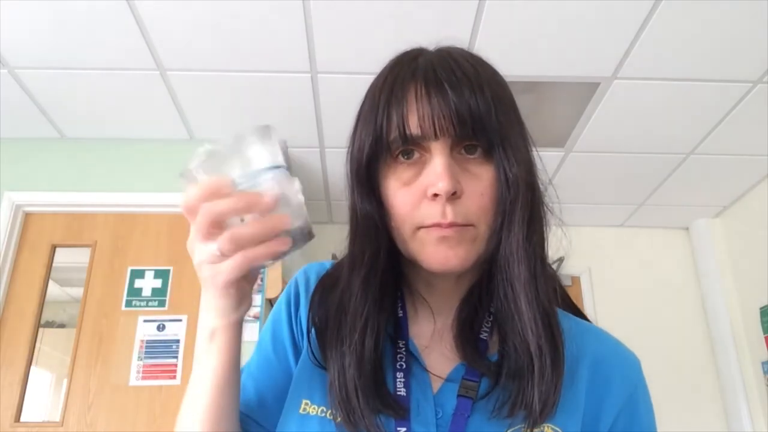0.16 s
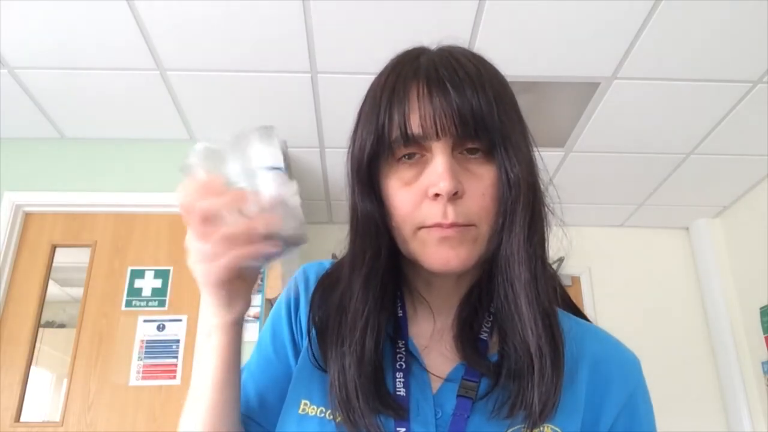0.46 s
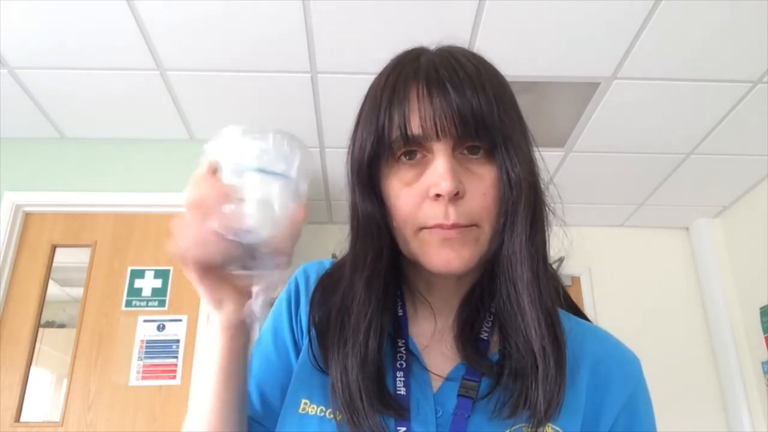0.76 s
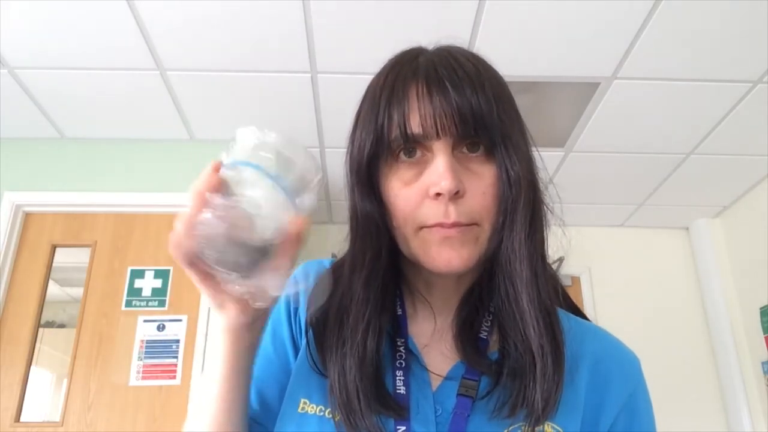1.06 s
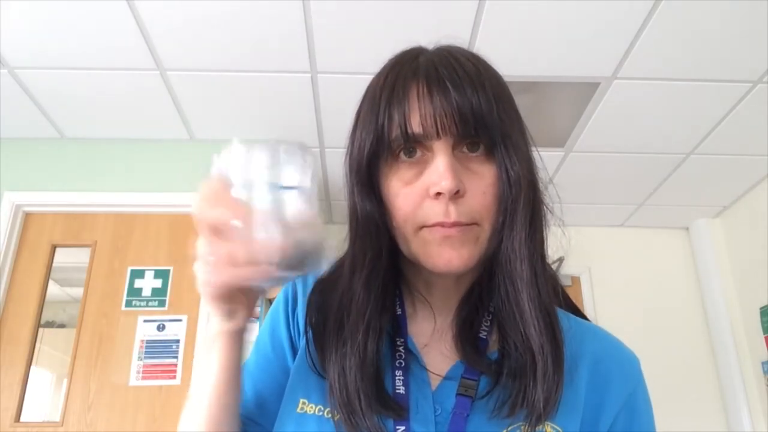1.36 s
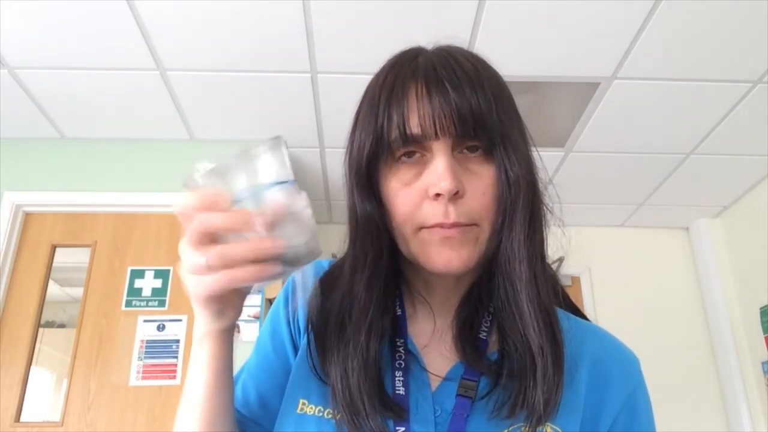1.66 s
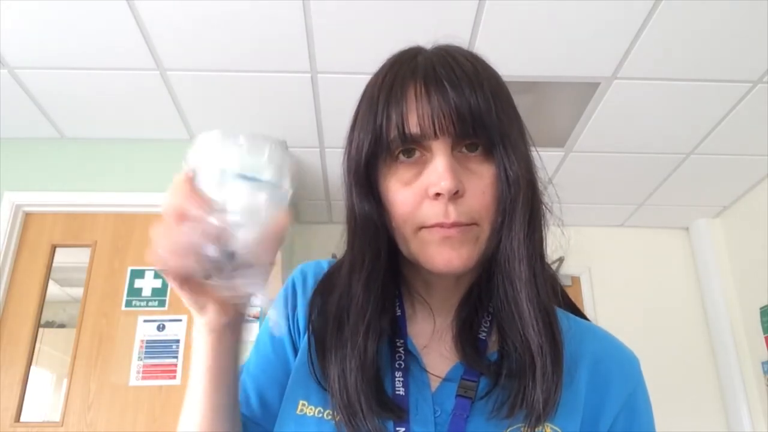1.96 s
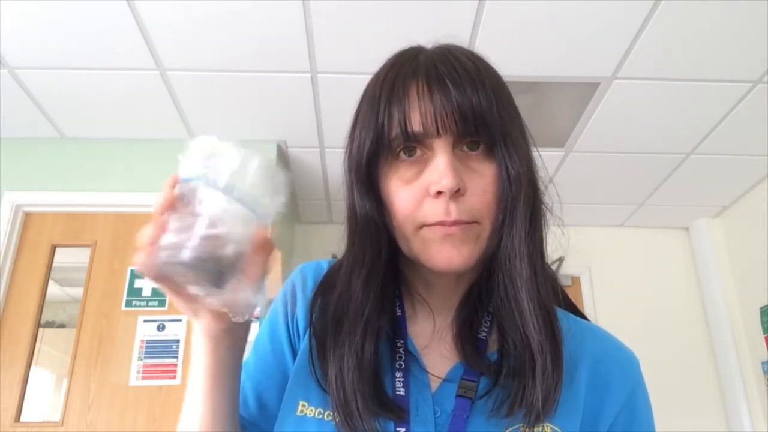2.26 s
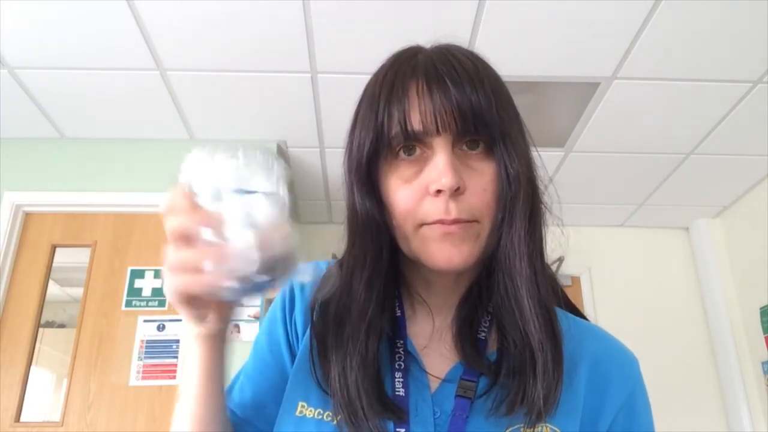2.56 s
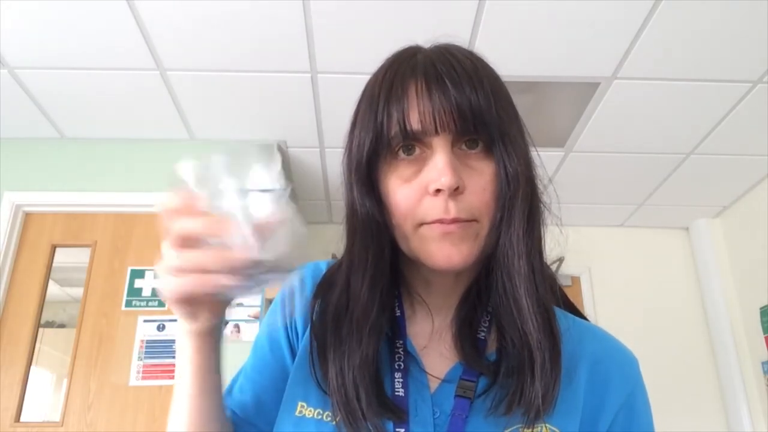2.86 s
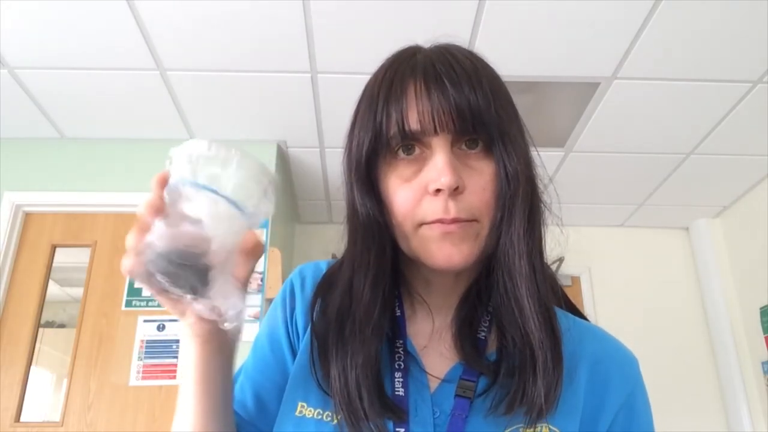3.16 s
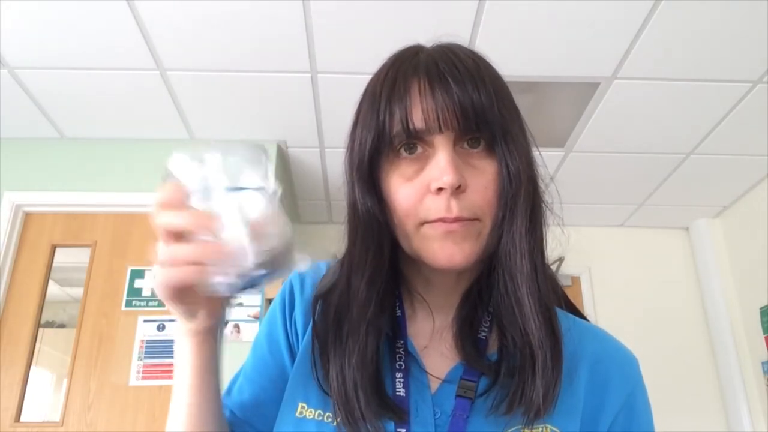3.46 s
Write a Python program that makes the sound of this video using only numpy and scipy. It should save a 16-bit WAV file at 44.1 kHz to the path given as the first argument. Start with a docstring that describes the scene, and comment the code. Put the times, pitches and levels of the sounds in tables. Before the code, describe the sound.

A small plastic bottle of hard beads shaken fast, giving a loud, even, crisp rattle indoors

```python
"""A small plastic bottle part-filled with hard beads is shaken to and fro about six times a second.
Ventilation rumbles low in a quiet office from the start, and sliding beads tick along the wall between turns.
At each turn beads pile against one end: noise impacts swell through the resonances of hollow, wall and beads.
From the first turns on, short noise bursts add single cracks and hollow thumps; dull thuds join after half a second.
Room echoes, shifting from turn to turn, trail the bottle, heard close up with the highest treble cut away."""
import sys
import numpy as np
from scipy import signal
from scipy.fft import rfft, irfft
from scipy.io import wavfile

SR = 44100
rng = np.random.default_rng(int(sys.argv[2]) if len(sys.argv) > 2 else 0)


def to_wav(s):
    """Save 16-bit WAV."""
    ch = np.atleast_2d(s).T  # columns
    pcm = np.round(np.clip(ch, -1, 1) * 32767)  # PCM
    wavfile.write(sys.argv[1], SR, pcm.astype(np.int16))


N = 158760

# Ventilation spectrum. Each row: frequency in Hz, relative density in dB per Hz.
AIR_SPECTRUM = [(15, -46), (25, -5), (65, -5), (91, 6.5), (161, -3), (220, -11), (260, -0.5), (340, -25),
                (570, -120)]
# Turns of the wrist. Each row: time in seconds, reference rattle level in dB, gather time in ms,
# scatter time in ms, reference sliding level after it in dB, hollow level in dB, hollow lead in ms,
# then wall, shell and bead levels in dB relative to the reference rattle level.
WRIST_TURNS = [(0.052, -24, 22, 18, -22.5, -30, 10, -5.5, -0.5, -3),
               (0.14, -15, 25, 9.9, -23.5, -23, 24, -12.5, -7.5, -5.5),
               (0.205, -16.5, 13, 21, -30, -26, 5, -10, -5, -4.5),
               (0.288, -18.5, 30, 23, -27, -23, 12, -12, -5, -3.5),
               (0.368, -18, 22, 27, -27, -30.5, 22, -13.5, -4, -5.5),
               (0.452, -18, 15, 16, -27, -32.5, 17, -13, -9, -3),
               (0.536, -18.5, 21, 13, -23.5, -31.5, 17, -12.5, -3.5, -2),
               (0.614, -20, 25, 19, -25.5, -23.5, 21, -14, -8.5, -1),
               (0.7, -20, 26, 15, -25.5, -30, 3, -12, -2, -4),
               (0.782, -19.5, 20, 17, -24, -27.5, 2, -28, -5.5, -4.5),
               (0.867, -15.5, 24, 14, -37, -32, 1, -11.5, -7.5, -5),
               (0.958, -15.5, 37, 19, -27, -23, 31, -15, -5, -4),
               (1.041, -17.5, 17, 8.7, -23.5, -36, 1, -6.5, -2, -0.5),
               (1.124, -16, 15, 13, -24.5, -33, 16, -19, -7, -2.5),
               (1.21, -18, 15, 8.9, -25, -51, -7, -9.5, -3.5, -1),
               (1.295, -17.5, 25, 19, -25.5, -25, 13, -12, -6.5, -1),
               (1.38, -12.5, 14.4, 9.7, -25, -53, -5, -10.5, -8.5, -6.5),
               (1.468, -18, 28, 26, -31.5, -25.5, 9, -11, -8.5, -4),
               (1.552, -15, 18.5, 15, -28, -29, 12, -11, -4.5, -5),
               (1.64, -18.5, 23, 25, -29.5, -23, 22, -11, -4.5, -3.5),
               (1.723, -14.5, 12.5, 10.6, -24.5, -46, 9, -8, -6, -4.5),
               (1.81, -16, 15, 20, -26, -27, -1, -17, -7, -2.5),
               (1.895, -15, 14, 16, -28.5, -34, 14, -10.5, -4.5, -3),
               (1.979, -16.5, 29, 26, -24.5, -24, 9, -16, -6.5, -4),
               (2.064, -17.5, 12, 8, -24.5, -28.5, 2, -4.5, -1, 1),
               (2.158, -19.5, 21, 16, -26.5, -30, 10, -17, -6, -3),
               (2.236, -16.5, 15, 7.6, -24, -30, 28, -8.5, -4, -1),
               (2.323, -17.5, 17, 12, -25.5, -34, 23, -15.5, -7, -6.5),
               (2.405, -16, 14.5, 14.5, -25.5, -31, 16, -13, -3.5, -3.5),
               (2.497, -17, 21, 18, -30.5, -26.5, 25, -12.5, -6.5, -7),
               (2.584, -15, 14.4, 15.6, -26, -35, 14, -13, -3.5, -4.5),
               (2.673, -14, 11.4, 11, -25, -27, 2.5, -13.2, -7.5, -2),
               (2.751, -13.5, 11.5, 13, -27, -34, 15, -11.5, -6, -6.5),
               (2.844, -15, 22, 19, -27.5, -25, 11.5, -15, -10, -5.5),
               (2.932, -13.5, 12, 9.3, -26.5, -31, 9, -10, -6.5, -5),
               (3.026, -16, 16, 22, -27, -25.5, 23, -16, -8, -3),
               (3.111, -14.5, 12, 10.5, -24.5, -28.5, 1, -11, -3.5, -7),
               (3.202, -18, 14, 27, -29.5, -31, 12, -16.5, -7, -8.5),
               (3.283, -11.5, 6.6, 12.3, -23.5, -32, -4, -10.5, -7.5, -7),
               (3.389, -15.5, 16, 12, -28.5, -25.5, 12, -26, -7.5, -6.5),
               (3.483, -16.5, 10, 11, -27, -28.5, 4, -8.5, -3, -2),
               (3.586, -13.5, 9, 13, -29, -24.5, -5, -16, -6, -7.5)]
# Resonances by part of the bottle. Each row: frequency in Hz, nominal width in Hz, relative level in dB.
HOLLOW_MODES = [(580, 101, 3.5), (710.4, 146, 5), (810, 76, 3)]
WALL_MODES = [(200, 290, -26.5), (372, 210, -12.5), (972, 270, -4.5), (1374, 234, -1), (1618, 280, -4.5),
              (2010, 236, -5), (2192, 490, -6.5)]
SHELL_MODES = [(2650, 530, -3), (3100, 354, 1.5), (3440, 230, 0), (3750, 317, 2), (4410, 550, 0),
               (4920, 570, -3.5)]
RATTLE_MODES = [(5430, 330, -2.5), (6230, 1200, -0.1), (7470, 890, -0.3), (8740, 2170, -2.5)]
BEAD_MODES = [(10050, 3400, -3), (11800, 2300, 4.5), (13220, 1670, 8), (15600, 1100, 3.5)]
# Single hard impacts that stand out. Each row: time in seconds, peak levels of shell, beads and wall
# in dB, favoured shell pitch in Hz.
BEAD_CRACKS = [(0.0444, -19, -20, -22, 4300), (0.0518, -11, -9, -33, 3450), (0.1242, -17, -8, -24, 3500),
               (0.1393, -25, -9, -23, 3750), (0.1685, -21, -21, -20, 3110), (0.194, -25, -13, -27, 4180),
               (0.2074, -12, -10, -26, 3270), (0.3627, -17, -13, -17.5, 2970), (0.3701, -23, -5, -22, 3450),
               (0.44, -22, -7, -28, 2740), (0.5337, -10.5, -21, -20, 3180), (0.6923, -18, -6, -17, 3750),
               (0.7673, -22, -20, -19, 3660), (0.7863, -23, -6, -27, 3500), (0.8585, -14, -12, -23, 3280),
               (0.8645, -13.5, -15, -17, 3520), (0.929, -16, -12, -16.5, 3980),
               (0.949, -18, -25, -21, 3960), (0.9585, -21, -11, -24, 3500), (1.0365, -13.5, -4, -24, 4740),
               (1.1156, -11.5, -17, -21.5, 3640), (1.1222, -17, -8, -28, 3730),
               (1.2032, -25, -8, -20, 3700), (1.2134, -14, -9, -22, 4140), (1.2868, -21, -10, -27, 4240),
               (1.3743, -15, -19, -15, 3270), (1.3837, -11, -21, -33, 3330), (1.5314, -29, -11, -23, 3020),
               (1.5443, -19, -1.5, -24, 3640), (1.5577, -17, -10, -22, 3570), (1.622, -21, -7, -30, 3840),
               (1.6331, -22, -12, -25, 3540), (1.6456, -16, -9, -25, 3040), (1.711, -15, -15, -33, 3090),
               (1.719, -22, -17, -25, 3400), (1.7228, -22, -9, -16, 3500), (1.7967, -20, -10, -24, 3420),
               (1.883, -17, -18, -22, 4270), (1.8982, -22, -15, -17, 3520), (1.9697, -13.5, -15, -20, 3670),
               (1.989, -17, -12, -29, 3500), (2.0507, -17, -13, -25, 3300),
               (2.0572, -12.5, -7, -12.5, 3240), (2.0618, -13, -2.5, -15.5, 4600),
               (2.156, -12, -15, -28, 3700), (2.232, -21, -16, -15, 3250), (2.312, -18, -17, -25, 3460),
               (2.4024, -13, -12, -15.5, 3540), (2.406, -11.5, -8, -25, 3600),
               (2.4778, -15, -18, -34, 3900), (2.495, -27, -7, -31, 3690), (2.4987, -21, -10, -26, 3520),
               (2.5754, -15.5, -14, -17, 3450), (2.5838, -18, -20, -19, 3200),
               (2.6678, -17, -15, -16, 2960), (2.672, -21, -13, -21, 3540), (2.7424, -14, -16, -21, 3640),
               (2.7501, -11, -7, -25, 3220), (2.839, -26, -12, -22, 3430), (2.8448, -28, -5, -23, 3500),
               (2.9304, -11.5, -3, -25, 3430), (3.022, -12.5, -15, -24, 4000),
               (3.1046, -15, -6, -15.5, 4200), (3.1929, -14, -11, -23, 3670), (3.2016, -18, -12, -23, 3530),
               (3.282, -10, -19, -14, 3600), (3.3821, -8, -17, -24, 3640), (3.4473, -17, -13, -28, 3430),
               (3.4675, -21, -18, -19, 3740), (3.475, -20, -12, -25, 3670),
               (3.4809, -11.5, -12, -12.5, 3650), (3.4863, -29, -7, -22, 3550),
               (3.563, -22, -13, -34, 3100), (3.581, -15, -18, -32, 3660), (3.5862, -15, -15, -26, 3500)]
# Single thumps on the hollow end. Each row: time in seconds, peak level in dB, favoured pitch in Hz.
HOLLOW_THUMPS = [(0.092, -19.5, 630), (0.119, -15.5, 690), (0.168, -22, 630), (0.197, -21, 829),
                 (0.259, -28, 727), (0.273, -14, 740), (0.404, -21.5, 656), (0.437, -14.5, 755),
                 (0.563, -23, 640), (0.666, -25.5, 800), (0.748, -24, 694), (0.8, -25, 726),
                 (0.961, -17, 633), (1.036, -23, 594), (1.082, -19.5, 630), (1.105, -24, 660),
                 (1.118, -22, 620), (1.242, -25, 735), (1.283, -22, 650), (1.292, -15.5, 630),
                 (1.373, -24, 756), (1.44, -20, 690), (1.455, -18, 720), (1.623, -16, 690),
                 (1.645, -21.5, 710), (1.719, -17.5, 810), (1.766, -23.5, 744), (1.797, -12, 696),
                 (1.812, -27, 580), (1.896, -23, 810), (1.955, -19, 696), (1.979, -19, 736),
                 (2.146, -19.5, 670), (2.273, -20, 770), (2.318, -18, 700), (2.46, -22, 646),
                 (2.567, -24, 785), (2.631, -31, 640), (2.658, -18, 716), (2.738, -21, 818),
                 (2.823, -24, 726), (2.997, -22, 780), (3.016, -22, 800), (3.106, -30, 810),
                 (3.179, -21.5, 720), (3.195, -23.5, 714), (3.282, -24, 900), (3.365, -25, 710),
                 (3.392, -22, 700), (3.468, -28, 592), (3.483, -20, 820)]
# The whole heap landing at once on the wall. Each row: time in seconds, peak level in dB.
HEAP_THUDS = [(0.53, -34), (0.862, -43), (1.032, -45), (1.376, -34), (1.55, -34), (1.717, -28),
              (1.895, -34.5), (2.054, -30), (2.749, -34.5), (2.842, -31), (3.284, -39), (3.482, -37)]

TURN_SAMPLES = np.array(WRIST_TURNS)[:, 0] * SR
AIR_DB = -62
IMPACTS_PER_S, KNOCKS_PER_S = 4200, 1500  # beads on the body; knocks on the hollow end
SIZE_SPREAD_DB, BIGGEST_DRAW = 3.3, 1.55  # dB per unit of the size draw; cap on that draw
COLOUR_SPREAD_DB, LANDING_SPREAD_DB = 3.2, 2  # from impact to impact; from turn to turn
CONTACT_MS = 0.9  # chatter decay of each impact
HOLLOW_SPREAD_MS, HOLLOW_SLIDE_DB, HOLLOW_FALL_MS_PER_OCT = 18.2, -36.5, 26
RATTLE_DB = -5  # against the reference rattle and sliding levels
SLIDE_WALL_DB, SLIDE_SHELL_DB, SLIDE_BEAD_DB = -13, -7, -8  # against the reference sliding level
CRACK_MS, THUMP_MS, THUD_MS = 1.4, 1.2, 0.5  # decay of the contact noise
FAVOUR_DB_PER_OCT = 75  # loss away from the favoured pitch
ROOM_T60_S, ROOM_DB, ROOM_TOP_HZ, POSITIONS = 0.66, -11.5, 9900, 6
ROLLOFF_HZ, SHELF_DB, TOP_HZ = 13150, -21.5, 15730


def undb(db):
    """Turn decibels into an amplitude factor."""
    return 10 ** (np.asarray(db) / 20)


def rms(x):
    """Root-mean-square level."""
    return np.sqrt(np.mean(x ** 2))


def air():
    """Low ventilation rumble: white noise shaped by its spectrum."""
    hz = np.arange(N // 2 + 1) * SR / N + 1e-3
    table_hz, table_db = np.array(AIR_SPECTRUM).T
    shape = undb(np.interp(np.log(hz), np.log(table_hz), table_db))
    rumble = irfft(rfft(rng.standard_normal(N)) * shape, N)
    return undb(AIR_DB) * rumble / rms(rumble)


def ring(x, hz, width_hz, order=2):
    """Resonant stages in a row; white input keeps its density at the centre."""
    b, a = signal.iirpeak(hz, hz / (1.635 * width_hz), fs=SR)
    for _ in range(order):
        x = signal.lfilter(b, a, x)
    return x


def swell(times, db, rise_ms, fall_ms):
    """Summed power of humps that rise and fall 7.15 dB in the given times (2 ms at least)."""
    coarse = np.arange(0, N, 32)
    t, power = coarse / SR, 0
    for at, peak_db, rise, fall in zip(times, db, rise_ms, fall_ms):
        distance = 1000 * (t - at) / np.where(t < at, max(rise, 2), max(fall, 2))
        power = power + undb(peak_db - 7.15 * np.abs(distance) ** 1.034) ** 2
    return np.interp(np.arange(N), coarse, power)


def draw_impacts():
    """Impacts at random moments, their sizes spread in dB by a capped exponential draw."""
    count = int(IMPACTS_PER_S * N / SR)
    at = rng.integers(0, N, count)
    draw = np.minimum(rng.exponential(size=count), BIGGEST_DRAW)
    return at, undb(SIZE_SPREAD_DB * draw)


def rain(modes, at, size, force, ms_per_oct=0, order=2):
    """All impacts ring one part; each chatters briefly and hits every resonance with its own strength."""
    out = 0
    for hz, width, db in modes:
        hits = np.zeros(N)
        colour_db = COLOUR_SPREAD_DB * np.clip(rng.standard_normal(len(at)), -2, 2)
        np.add.at(hits, at, size * undb(colour_db))
        decay = np.exp(-2000 / (CONTACT_MS * SR))  # smooths power, hence 2000
        chatter = np.sqrt(signal.lfilter([1], [1, -decay], hits ** 2)) * rng.standard_normal(N)
        landing = np.interp(np.arange(N), TURN_SAMPLES, rng.standard_normal(len(TURN_SAMPLES)))
        chatter = chatter * undb(LANDING_SPREAD_DB * landing)
        steady_level = rms(ring(chatter, hz, width, order))
        # with a pitch fall, lower modes swell later than higher ones
        delay = int(ms_per_oct * np.log2(modes[1][0] / hz) * SR / 1000)
        ringing = ring(chatter * np.roll(force, delay), hz, width, order)
        out = out + undb(db) * np.sqrt(width) * ringing / steady_level
    return out / np.sqrt(sum(undb(db) ** 2 * width for _, width, db in modes))


def hollow_knocks(size):
    """Knocks on the hollow end, whose pitch sinks through each landing."""
    turns = np.array(WRIST_TURNS, float).T
    count = int(KNOCKS_PER_S * N / SR)
    at = rng.integers(0, N, count)
    spread_ms = np.full(len(turns[0]), HOLLOW_SPREAD_MS)
    landing_power = swell(turns[0] - turns[6] / 1000, turns[5], spread_ms, spread_ms)
    force = np.sqrt(landing_power + undb(HOLLOW_SLIDE_DB) ** 2)
    return rain(HOLLOW_MODES, at, np.sqrt(size[:count]), force, HOLLOW_FALL_MS_PER_OCT, order=3)


def rattle(at, size):
    """Dense bead impacts ring wall, shell and beads, swelling at each turn and sliding in between."""
    turn_s, level_db, gather_ms, scatter_ms, slide_db, _, _, wall_db, shell_db, bead_db = \
        np.array(WRIST_TURNS, float).T
    between_s = (turn_s + np.append(turn_s[1:], N / SR)) / 2
    slide_power = undb(np.interp(np.arange(N) / SR, between_s, slide_db)) ** 2

    def part(modes, turn_db, sliding_db):
        landing_power = swell(turn_s, level_db + turn_db, gather_ms, scatter_ms)
        return rain(modes, at, size, np.sqrt(landing_power + slide_power * undb(sliding_db) ** 2))

    return (part(WALL_MODES, wall_db, SLIDE_WALL_DB) + part(SHELL_MODES, shell_db, SLIDE_SHELL_DB)
            + part(RATTLE_MODES, RATTLE_DB, RATTLE_DB) + part(BEAD_MODES, bead_db, SLIDE_BEAD_DB))


def blows(times, db, modes, ms, pitch_hz=None, order=2):
    """Short noisy contacts through a set of resonances, scaled to their peak; a given pitch is favoured."""
    length = 1024
    out, t = np.zeros(N + length), np.arange(length) / SR
    for n, (at, peak_db) in enumerate(zip(times, db)):
        push = rng.standard_normal(length) * np.exp(-1000 * t / ms)
        blow = 0
        for k, (hz, width, mode_db) in enumerate(modes):
            if pitch_hz is not None:
                mode_db = mode_db - FAVOUR_DB_PER_OCT * abs(np.log2(hz / pitch_hz[n]))
            # neighbouring modes alternate in sign
            blow = blow + (-1) ** k * undb(mode_db) * ring(push, hz, width, order)
        start = int(np.clip(at * SR, 0, N))
        out[start:start + length] += undb(peak_db) * blow / np.abs(blow).max()
    return out[:N]


def cracks():
    """Single beads crack on the shell, ringing it, the beads and the upper wall modes."""
    at, shell_db, bead_db, wall_db, pitch_hz = np.array(BEAD_CRACKS, float).T
    return (blows(at, shell_db, SHELL_MODES, CRACK_MS, pitch_hz)
            + blows(at, wall_db, WALL_MODES[2:], CRACK_MS)
            + blows(at, bead_db, RATTLE_MODES + BEAD_MODES, CRACK_MS))


def thumps():
    """Single beads thump the hollow end, each favouring one pitch."""
    at, peak_db, pitch_hz = np.array(HOLLOW_THUMPS, float).T
    return blows(at, peak_db, HOLLOW_MODES, THUMP_MS, pitch_hz, order=3)


def thuds():
    """The whole heap knocks dully on the two lowest wall modes."""
    at, peak_db = np.array(HEAP_THUDS).T
    return blows(at, peak_db, WALL_MODES[:2], THUD_MS)


def room(dry):
    """The hand keeps moving, so the decaying-noise echoes change from one turn to the next."""
    t, wet = np.arange(SR // 2) / SR, 0
    place = rng.integers(0, POSITIONS, len(TURN_SAMPLES))
    for k in range(POSITIONS):
        fade = undb(-60 * t / ROOM_T60_S) * np.clip(t / 0.00094, 0, 1)  # 0.94 ms onset
        tail = rng.standard_normal(len(t)) * fade
        tail = signal.lfilter(*signal.butter(1, ROOM_TOP_HZ, fs=SR), tail)
        share = np.sqrt(np.interp(np.arange(N), TURN_SAMPLES, place == k))
        wet = wet + signal.fftconvolve(dry * share, tail / np.sqrt(np.sum(tail ** 2)))[:N]
    return undb(ROOM_DB) * wet


def scene():
    """The shaken bottle, its room echoes and the ventilation."""
    at, size = draw_impacts()
    bottle = hollow_knocks(size) + rattle(at, size) + cracks() + thumps() + thuds()
    return (bottle + room(bottle) + air())[None]


def record(dry):
    """Output filter: the treble drops to a low level above ROLLOFF_HZ and is cut steeply at TOP_HZ."""
    body = signal.sosfilt(signal.butter(10, ROLLOFF_HZ, fs=SR, output="sos"), dry)
    treble = signal.sosfilt(signal.butter(4, ROLLOFF_HZ, "high", fs=SR, output="sos"), dry)
    steep_cut = signal.ellip(14, 0.3, 82, TOP_HZ, fs=SR, output="sos")
    return signal.sosfilt(steep_cut, body + undb(SHELF_DB) * treble)


dry = scene()
out = record(dry)
to_wav(out)
```